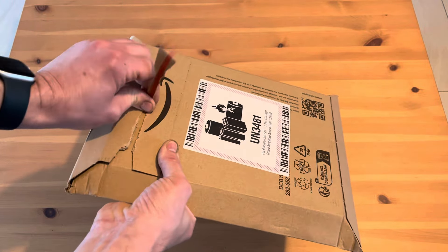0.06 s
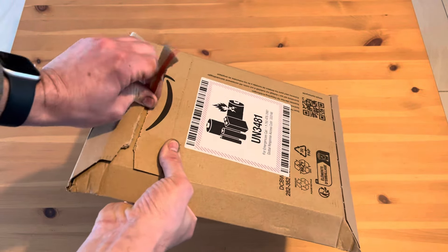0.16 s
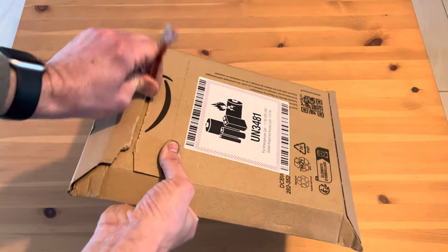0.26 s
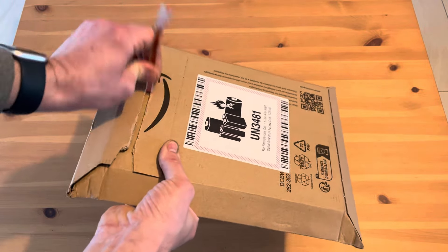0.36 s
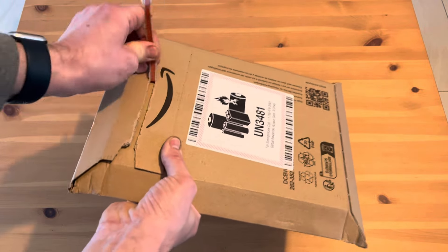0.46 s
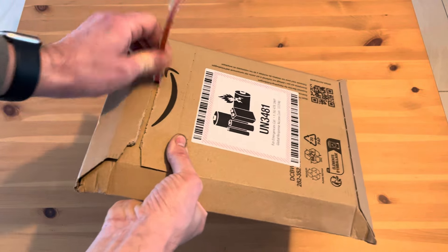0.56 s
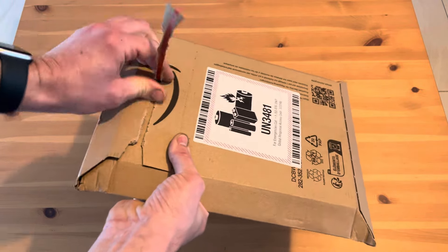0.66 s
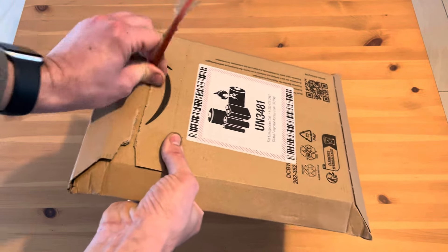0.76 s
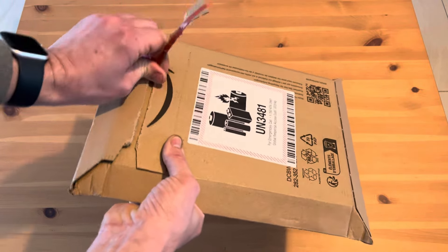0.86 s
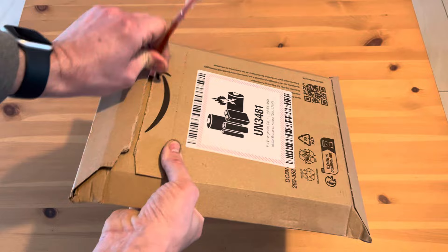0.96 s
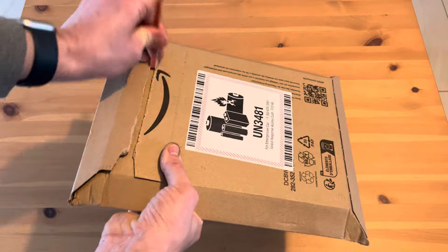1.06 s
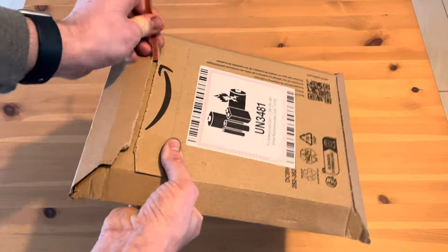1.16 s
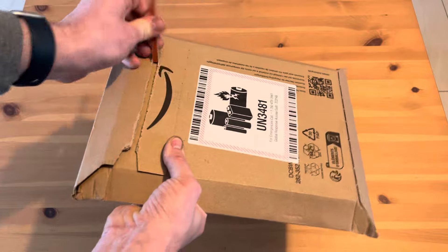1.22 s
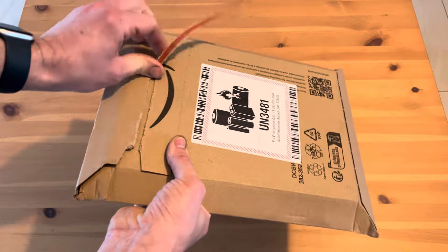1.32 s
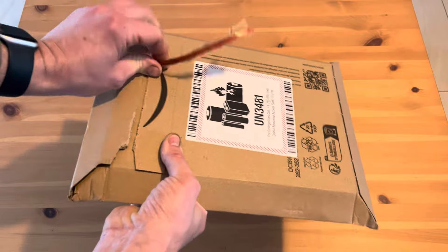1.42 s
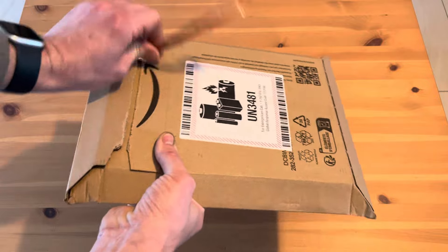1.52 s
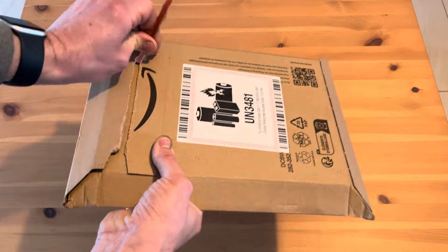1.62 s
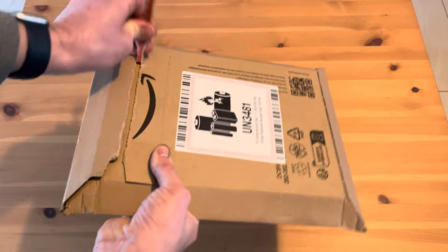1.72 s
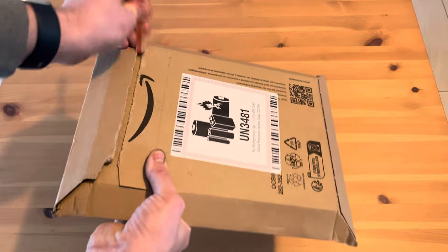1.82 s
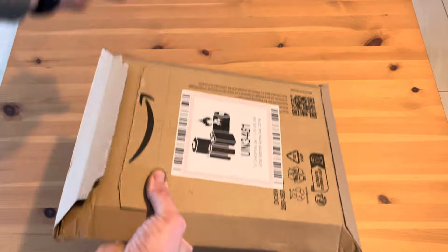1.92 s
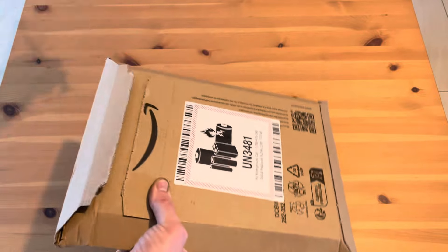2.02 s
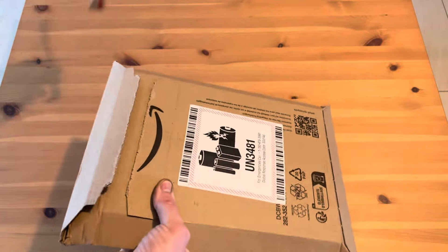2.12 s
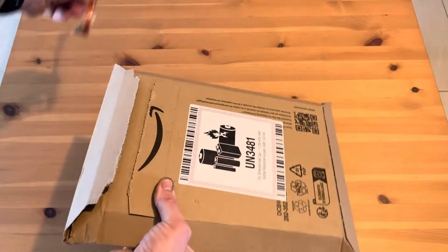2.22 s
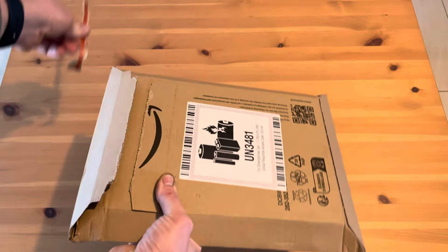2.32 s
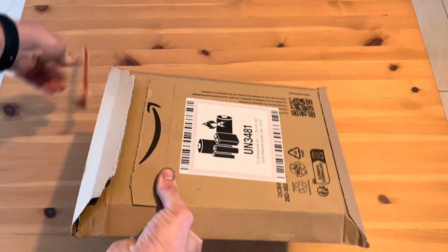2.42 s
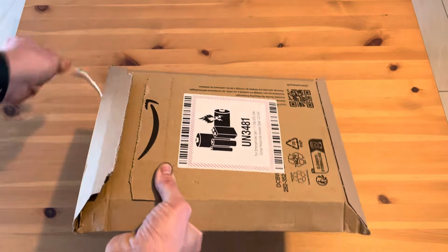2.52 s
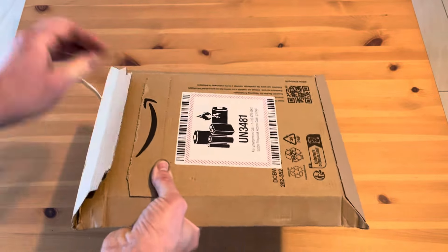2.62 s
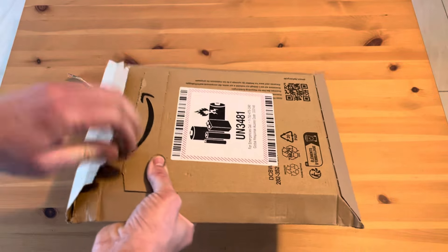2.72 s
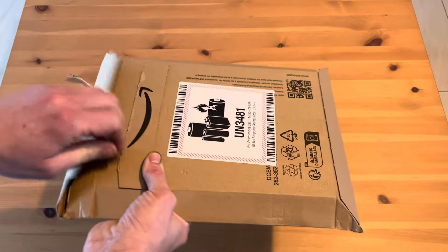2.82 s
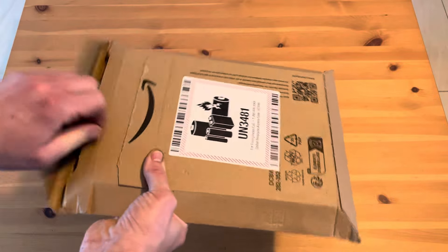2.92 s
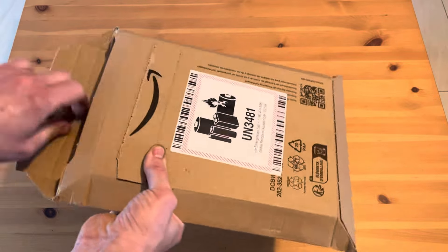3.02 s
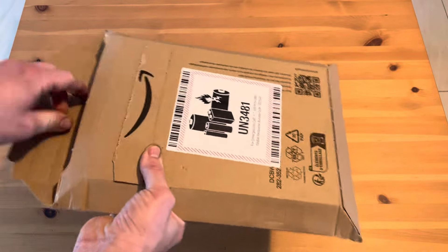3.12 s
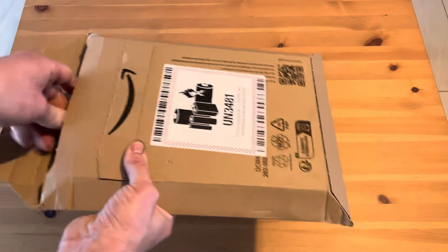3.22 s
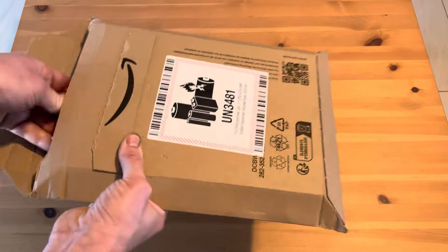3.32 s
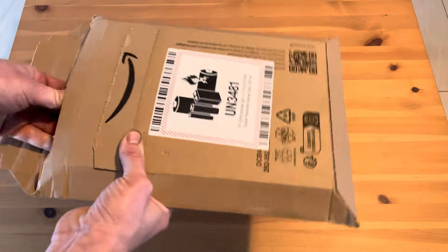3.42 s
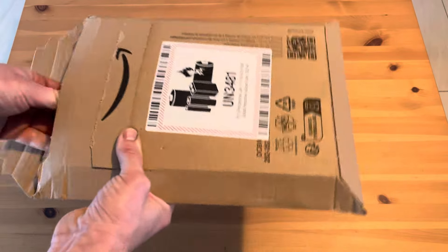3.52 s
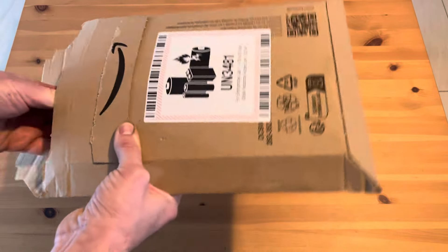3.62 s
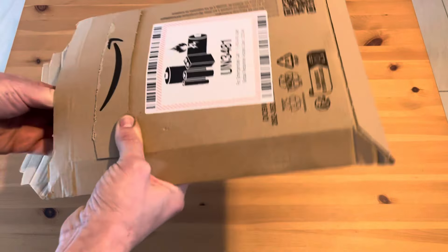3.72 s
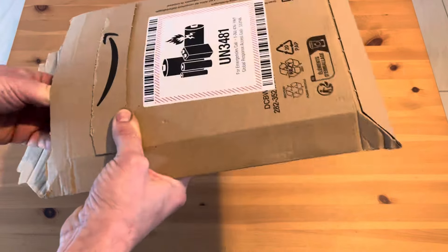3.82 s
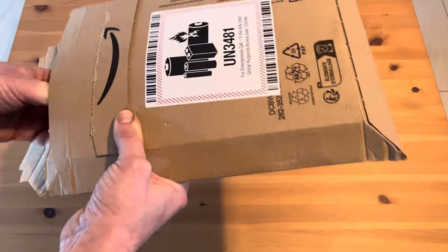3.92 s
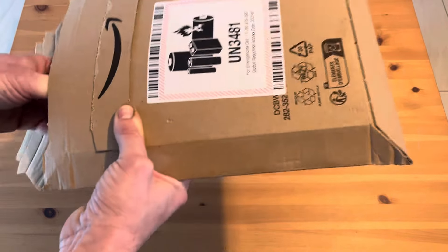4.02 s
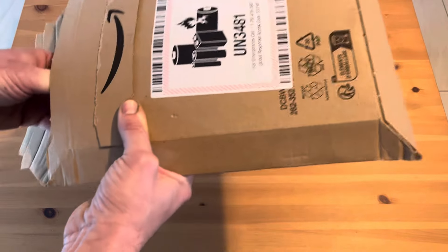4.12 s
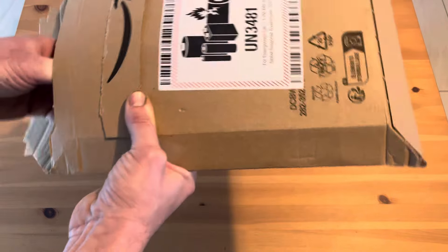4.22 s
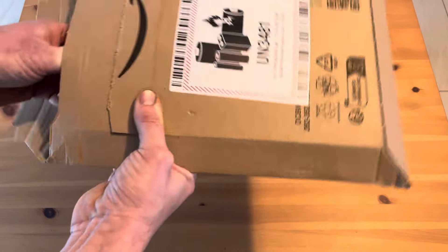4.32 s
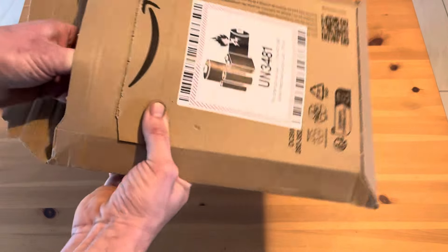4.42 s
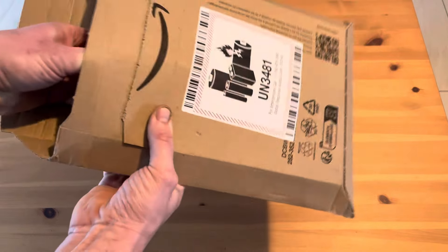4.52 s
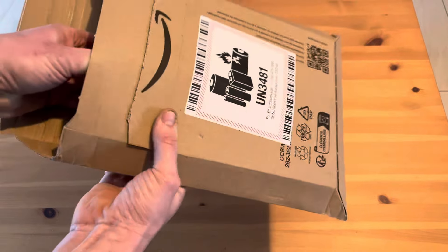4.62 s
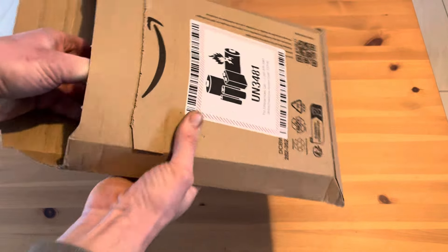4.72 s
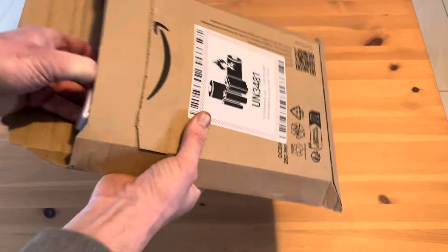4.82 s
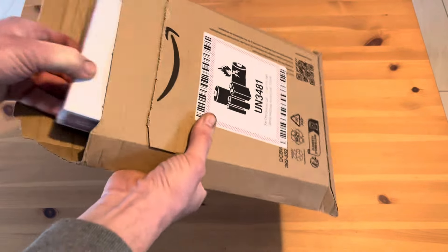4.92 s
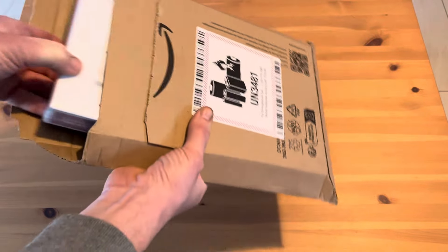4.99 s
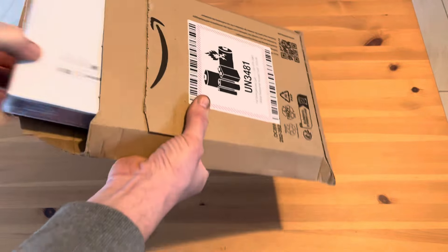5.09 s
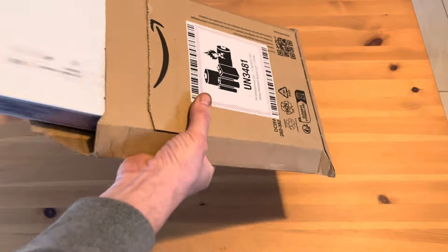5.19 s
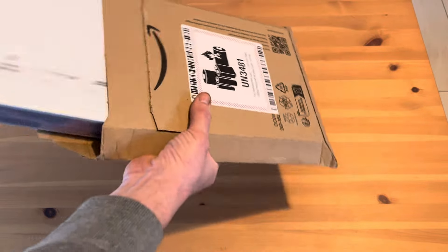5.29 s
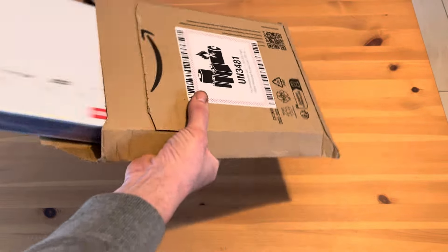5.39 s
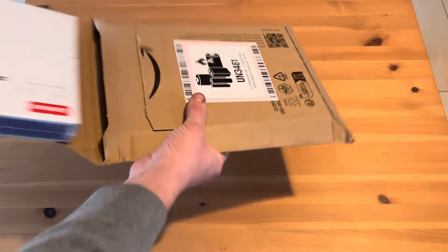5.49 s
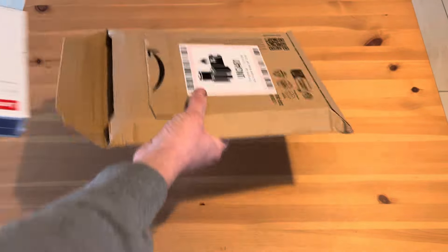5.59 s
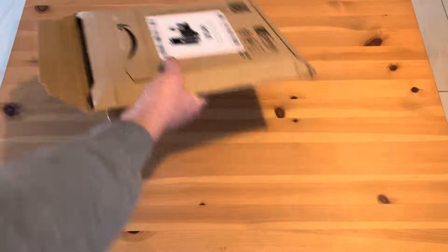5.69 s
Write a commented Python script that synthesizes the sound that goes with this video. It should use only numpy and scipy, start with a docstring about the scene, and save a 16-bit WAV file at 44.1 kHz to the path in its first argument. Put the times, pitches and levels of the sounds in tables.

```python
"""A bare room, over a table top: hands open a cardboard mailer close to a microphone with two ports.
They tear off its strip in three pulls, put the strip aside, fold the flap back and slide a box out.
Streams of random fibre snaps drive panel and board resonances and coloured scratch; creases give as
short bursts of splinters, bent patches pop as fading sines, and the whole parcel heaves as low swings.
Decaying noise makes the room's echo, over quiet air; a faint narrow tone sounds before the first pull."""
import sys
import numpy as np
from scipy import signal
from scipy.fft import rfft, irfft, next_fast_len
from scipy.io import wavfile
from scipy.ndimage import uniform_filter1d

SR = 44100
rng = np.random.default_rng(int(sys.argv[2]) if len(sys.argv) > 2 else 0)


def generate_wav(signal):
    """Clip the signal to [-1, 1] and save it as 16-bit WAV at the path in sys.argv[1]."""
    frames = np.transpose(np.atleast_2d(signal))
    scaled = np.clip(frames, -1, 1) * 32767
    pcm = np.round(scaled).astype(np.int16)
    wavfile.write(sys.argv[1], SR, pcm)


N = 253575  # samples


def undb(db):
    """Amplitude factor for a level in dB."""
    return 10 ** (np.asarray(db) / 20)


def unit(x):
    """Scale to an rms of 1."""
    return x / np.sqrt(np.mean(x ** 2))


def unit_peak(x):
    """Scale to a highest value of 1."""
    return x / x.max()


def on_log(hz, table):
    """Read (f/Hz, value) points on a log-frequency axis."""
    points = np.array(table, float)
    return np.interp(np.log(hz + 1), np.log(points[:, 0] + 1), points[:, 1])


def colour(x, table, size=4096):
    """Causal filter with the given (f/Hz, level/dB) shape, from the folded cepstrum; power gain 1."""
    gain = undb(on_log(np.fft.rfftfreq(size, 1 / SR), table))
    cepstrum = irfft(np.log(gain))
    cepstrum[1:size // 2] *= 2
    cepstrum[size // 2 + 1:] = 0
    impulse = irfft(np.exp(rfft(cepstrum)))
    return signal.fftconvolve(x, impulse / np.sqrt(np.sum(impulse ** 2)))[:len(x)]


def butter(x, order, hz, kind):
    """Butterworth filter of the given kind."""
    return signal.sosfilt(signal.butter(order, hz, kind, fs=SR, output="sos"), x)


def walk(rate):
    """Random values, each held 1 / rate s, then smoothed twice over that time; rms 1."""
    hold = int(SR / rate)
    steps = np.repeat(rng.standard_normal(N // hold + 1), hold)
    return unit(uniform_filter1d(uniform_filter1d(steps, hold), hold)[:N])


def ring(push, modes, spot_db):
    """The push rings each mode; the point of contact wanders, so each mode's share does too."""
    out, power = 0, 0
    for hz, db, t60 in modes:
        radius = np.exp(-np.log(1000) / (t60 * SR))
        poles = [1, -2 * radius * np.cos(2 * np.pi * hz / SR), radius ** 2]
        drifting_push = push * undb(spot_db * walk(30))
        out = out + undb(db) * signal.lfilter([.5, 0, -.5], poles, drifting_push)
        power += undb(2 * db) / (2 * (1 - radius ** 2))
    return out / np.sqrt(power)  # power gain near 1


# Quiet room air: f/Hz, relative density level/dB per Hz
AIR_SHAPE = [(18, -33.5), (45, 16.5), (439, -4.5), (1740, -20.5), (2350, -25), (5250, -34.5), (6410, -50),
             (12000, -19.5), (15600, -61), (22000, -120)]
AIR_DB = -66  # rms of each stream


def quiet_air():
    """Steady coloured noise, the quiet of the room."""
    return undb(AIR_DB) * unit(colour(rng.standard_normal(N), AIR_SHAPE))


WHISTLE_HZ, WHISTLE_WIDTH_HZ, WHISTLE_DB, WHISTLE_ENDS_S = 1760, 155, -63.5, 0.21


def whistle():
    """A faint breathy tone, narrow-band noise, that fades out just before the first pull."""
    b, a = signal.iirpeak(WHISTLE_HZ, WHISTLE_HZ / WHISTLE_WIDTH_HZ, fs=SR)
    fade = np.clip((WHISTLE_ENDS_S - np.arange(N) / SR) / 0.03, 0, 1)
    return undb(WHISTLE_DB) * fade * unit(signal.lfilter(b, a, rng.standard_normal(N)))


# High panel modes of the cardboard: f/Hz, relative level/dB, t60/s
PANEL_MODES = [(750, -3.5, 0.023), (873, 1, 0.03), (1025, 9, 0.012), (1336, 18.5, 0.0072),
               (1695, 12, 0.012), (1840, -5, 0.014)]
# Board and the air inside it: f/Hz, relative level/dB, t60/s
BOARD_MODES = [(87, -12.5, 0.29), (126, -16, 0.042), (163.5, 7.5, 0.065), (196, -3, 0.22),
               (245.7, 5, 0.098), (288, 11, 0.029), (353, 0, 0.06), (410, -4, 0.074), (459, 6, 0.039),
               (525, -18, 0.037)]
# Spectrum of bare scratching: f/Hz, relative level/dB
SCRATCH_SHAPE = [(600, -32), (1800, -3), (2600, 2.5), (4500, 1.5), (7000, -2), (8300, -1), (9500, -30.5)]
# Spectrum of the fizz above it: f/Hz, relative level/dB
FIZZ_SHAPE = [(7500, -45.5), (8600, -2), (10000, 1.5), (12000, 0.5), (13500, -5), (15000, -4),
              (16500, -24.5)]
# the board radiates little below, and is too lossy to ring above
BOARD_LOW_HZ, BOARD_TOP_HZ = 104, 2780


def parcel(rattle, board, scratch, fizz, spot_db):
    """What the cardboard makes of four pushes: panel modes, board modes, bare scratch and fizz."""
    modes = ring(rattle, PANEL_MODES, spot_db) + ring(board, BOARD_MODES, spot_db)
    modes = butter(modes, 2, [BOARD_LOW_HZ, BOARD_TOP_HZ], "band")
    return modes + colour(scratch, SCRATCH_SHAPE) + colour(fizz, FIZZ_SHAPE)


def fibres(rate, spread_db):
    """Fibres snap at random moments, rate per second; most are tiny, a few are large."""
    chance, side, size = rng.random((3, N))
    snaps = (chance < rate / SR) * np.sign(side - .5)
    return unit(snaps * undb(-spread_db * np.log(1 - size)))


def jerks(rate, hold_s):
    """Stick and slip: sudden releases of random size that die away; mean 0, spread 1."""
    chance, size = rng.random((2, N))
    releases = (chance < rate / SR) * -np.log(1 - size)
    slip = signal.lfilter([1], [1, -np.exp(-1 / (hold_s * SR))], releases)
    return (slip - slip.mean()) / slip.std()


HOLD_S = 0.011  # a spell keeps its last level this long


def levels(spells, mix_db):
    """Levels of panel, board, scratch and fizz over time; silence outside the spells."""
    t = np.arange(N) / SR
    db = np.full((4, N), -200.)
    for rows in spells:
        s, *layers = np.transpose(rows)
        on = (t >= s[0]) & (t < s[-1] + HOLD_S)
        db[:, on] = np.array([np.interp(t[on], s, layer) for layer in layers]) + np.c_[list(mix_db)]
    return db


# Hands rub the board: before and between the pulls, on the flap, reaching in, sliding the box out.
# Per spell: t/s, then panel rattle, board ring, scratch and fizz level/dB, before RUB_MIX
RUB_SPELLS = [
    [(0.0, -63, -58, -62, -68), (0.026, -60, -60, -63, -71), (0.04, -60, -71, -63, -69),
     (0.074, -59, -64, -68, -73), (0.086, -69, -52.5, -67, -69), (0.116, -63, -58, -65, -71),
     (0.124, -60, -55, -60, -50), (0.136, -61, -58, -67, -73), (0.172, -63, -54, -58, -51),
     (0.184, -61, -69, -65, -61), (0.2, -52, -64, -55, -52), (0.209, -50, -62, -52, -43)],
    [(0.42, -32, -42, -46, -46), (0.434, -53, -40, -61, -71), (0.482, -57, -50, -58, -68),
     (0.602, -55, -64, -62, -65), (0.612, -41, -55, -52, -55), (0.624, -59, -48, -55.5, -63),
     (0.668, -51, -48, -58, -55.5), (0.776, -51, -63, -55.5, -52.5), (0.808, -44, -56, -49, -39.5),
     (0.846, -55, -56, -59, -66), (0.852, -54, -56, -58, -53)],
    [(1.12, -50, -54, -52, -49), (1.204, -65, -60, -67, -66), (1.228, -50, -47, -56, -52),
     (1.268, -43, -57, -49.5, -54.5), (1.306, -56, -47, -62, -61), (1.338, -61, -58, -65, -67),
     (1.472, -65, -54.5, -60.5, -63.5), (1.56, -55.5, -56, -55, -56), (1.578, -46, -28.5, -40.5, -47),
     (1.588, -45, -39, -57, -57), (1.62, -52, -49, -50, -43)],
    [(2.777, -74, -51.5, -76, -81.5), (2.781, -62, -49.5, -59, -64), (2.787, -55, -47, -48, -61.5),
     (2.799, -52.5, -54, -56, -66), (2.826, -60.5, -55, -58, -62)],
    [(2.836, -44, -55, -44.5, -66), (2.854, -41.5, -32.5, -49, -46.5), (2.892, -38.5, -34.5, -53, -51),
     (2.902, -40, -40, -37.5, -42), (2.912, -46, -38, -51, -53), (2.942, -37, -38, -44, -48),
     (2.958, -38, -25.5, -41, -42.5), (2.976, -34, -22.5, -44.5, -52), (3.052, -53, -62, -63, -69),
     (3.078, -44, -48, -59, -66), (3.083, -56, -55, -60, -67)],
    [(3.093, -48, -46, -50, -62), (3.099, -44, -40, -51, -53), (3.117, -45.5, -35.5, -50.5, -56),
     (3.147, -49, -55, -54, -58), (3.163, -49, -44, -55, -57), (3.193, -48, -41, -56, -56),
     (3.201, -38, -42, -56, -56), (3.233, -55, -44, -60, -62), (3.248, -40, -36, -57, -57)],
    [(3.258, -25, -36, -42, -50), (3.264, -28, -23, -40, -41), (3.276, -35, -27, -47, -51),
     (3.294, -38, -53, -42, -47), (3.304, -20, -23, -41.5, -46), (3.32, -49, -33, -48, -51),
     (3.35, -59, -52, -58.5, -62), (3.432, -71, -48.5, -69, -78), (3.476, -54, -45, -57, -57),
     (3.502, -52, -44, -66, -69)],
    [(3.512, -48, -36, -52, -72), (3.558, -49, -50, -58, -64), (3.612, -53, -49.5, -63.5, -73),
     (3.656, -47, -48.5, -50.5, -58), (3.716, -54, -52, -64, -72), (3.724, -57, -43.5, -51, -59),
     (3.75, -52, -50, -60, -69), (3.79, -47, -45, -56, -65), (3.836, -61, -46, -72, -79),
     (3.868, -54, -49.5, -63, -67), (3.915, -52.5, -61, -66, -69)],
    [(3.925, -33, -49, -43.5, -46), (3.933, -41.5, -44, -53.5, -56), (3.967, -53, -43.5, -63, -69),
     (3.989, -42.5, -45, -47.5, -64), (4.005, -51, -38, -54.5, -58), (4.029, -43, -41, -61, -69),
     (4.059, -61, -66, -62.5, -73), (4.133, -60.5, -58, -61, -69), (4.171, -51.5, -54, -59, -65),
     (4.241, -51.5, -58, -62, -66), (4.245, -52, -61, -58, -61)],
    [(4.255, -42, -35, -50, -58), (4.273, -49, -46, -61, -65), (4.285, -40, -38, -54, -58),
     (4.299, -56, -35.5, -60, -63), (4.323, -56, -57, -56.5, -59), (4.371, -53.5, -59, -55.5, -58),
     (4.399, -52, -54, -53, -58), (4.445, -51.5, -61, -51, -53), (4.457, -54, -45, -51, -56),
     (4.492, -50, -52, -53, -53)],
    [(4.502, -48, -35, -41, -52), (4.504, -31, -35, -44, -49), (4.521, -53, -39, -54, -50)],
    [(4.531, -34, -22, -48, -33), (4.541, -57, -29, -59, -62), (4.561, -60, -61, -61, -64),
     (4.611, -59, -54, -58.5, -63), (4.647, -51.5, -56, -51.5, -54), (4.709, -47, -59, -48, -50),
     (4.737, -48, -51, -48, -50), (4.749, -55, -44, -50, -52), (4.792, -46, -41, -45.5, -47)],
    [(4.802, -34, -18.5, -44, -47), (4.815, -44, -28.5, -46, -45)],
    [(4.825, -26, -42, -38, -46), (4.829, -24.5, -35, -47, -47), (4.837, -45, -33, -45, -48),
     (4.853, -34.5, -34, -46.5, -47), (4.917, -71, -49, -55, -56.5), (5.019, -53, -49, -52.5, -55.5),
     (5.117, -45, -41, -47, -51), (5.173, -55, -41.5, -55, -54), (5.2, -46, -44, -53.5, -55)],
    [(5.21, -47, -40.5, -52, -55), (5.216, -51, -36, -59, -54), (5.234, -57, -44, -61, -54),
     (5.274, -49, -42, -55, -55), (5.288, -56.5, -41.5, -49.5, -56), (5.322, -47, -44.5, -57.5, -57),
     (5.368, -39, -36, -51, -53), (5.376, -34, -45, -43, -55), (5.386, -35, -32.5, -56, -56),
     (5.394, -51, -34.5, -56, -55), (5.421, -37.5, -44, -50, -55)],
    [(5.431, -36, -41, -46, -59), (5.441, -24.5, -25, -50, -59), (5.455, -40.5, -35, -59, -58),
     (5.479, -66, -37.5, -66, -69), (5.527, -61, -45, -70, -80), (5.559, -54, -59, -63, -66),
     (5.631, -60.5, -65, -66, -70), (5.691, -62, -54.5, -62, -67), (5.737, -58, -78, -61, -68),
     (5.75, -57, -63, -60, -66)],
]
# Three pulls on the tear strip, then its end rips free; same columns, before PULL_MIX
PULL_SPELLS = [
    [(0.219, -58, -62, -46, -33), (0.228, -25, -22.5, -40, -28), (0.29, -32, -29, -35.5, -33.5),
     (0.294, -28, -16, -37, -23.5), (0.316, -36, -40, -39, -37), (0.322, -30, -24.5, -38, -34),
     (0.35, -26, -21.5, -35, -32.5), (0.398, -34, -19, -39, -37), (0.42, -53, -40, -62, -49)],
    [(0.86, -50, -47.5, -60, -41), (0.866, -31, -33, -45, -30), (0.886, -38.5, -31.5, -36, -39),
     (0.918, -34.5, -28, -36, -32), (0.948, -48, -23.5, -38, -39), (0.968, -35, -29.5, -41.5, -31),
     (1.02, -38, -21, -40, -36.5), (1.108, -38.5, -45.5, -52.5, -42), (1.12, -54, -43.5, -60, -79)],
    [(1.625, -50.5, -41, -48, -54), (1.637, -37.5, -29, -45, -48), (1.661, -44, -28, -35.5, -37.5),
     (1.693, -36.5, -22.5, -36.5, -34), (1.761, -43.5, -33.5, -41, -42), (1.767, -36.5, -27.5, -39, -37.5),
     (1.793, -32.5, -25, -35, -32), (1.797, -28, -21, -36, -35)],
    [(1.797, -29, -20, -35, -35.5), (1.803, -18, -20, -26.5, -29.5), (1.817, -32, -23, -37.5, -42),
     (1.829, -8.5, -21, -19, -25), (1.837, -24.5, -27.5, -38.5, -41.5), (1.847, -22, -29.5, -19.5, -31),
     (1.865, -31.5, -23.5, -42.5, -49.5)],
]
# Trims for panel, board, scratch, fizz: level/dB
RUB_MIX = (-7, -7, 0, -0.5)
PULL_MIX = (-8.5, -5.5, -0.5, -0.5)
# Corrugations crush: f/Hz, relative level/dB
CRUNCH_SHAPE = [(300, -22), (600, -0.5), (1100, 0), (1700, -5), (2600, -24)]
# Table top under rubbing hands: f/Hz, relative level/dB
RUMBLE_SHAPE = [(20, -17.5), (50, -5.5), (90, 4.5), (160, -25), (400, -60)]
CRUNCH_DB, RUMBLE_DB = -8.5, -6.5  # re panel rattle, re board ring of the rubs
SLIDE_JERK_DB, TEAR_JERK_DB, TEAR_FROM_DB = 1.5, 2, -43.5
WANDER_DB = 1.5  # the rubbed spot moves, so each layer's share drifts
RUB_SOFT_HZ = 1120  # skin and box slide softly and stir the high panel modes less


def handling():
    """Tearing and rubbing: streams of snaps rattle, ring, scratch and fizz; the harder, the jerkier."""
    rub_db = levels(RUB_SPELLS, RUB_MIX)
    pull_db = levels(PULL_SPELLS, PULL_MIX)
    db = np.maximum(pull_db, rub_db)
    jerk_db = np.interp(db[0], [TEAR_FROM_DB, TEAR_FROM_DB + 13.5], [SLIDE_JERK_DB, TEAR_JERK_DB])
    slip = np.clip(jerks(110.0, 0.0062), -2, 2)

    fine = fibres(6000., 1.3)  # drives both scratch and fizz
    hard_rattle = fibres(1500., 1.2)
    soft_rattle = undb(-5.0) * unit(butter(hard_rattle, 1, RUB_SOFT_HZ, "low"))
    rattle = np.where(pull_db[0] > rub_db[0], hard_rattle, soft_rattle)
    snaps = np.array([rattle, fibres(1000., 1.0), fine, fine])
    snaps = snaps * undb(WANDER_DB * np.array([walk(12.) for _ in snaps]))
    # a fixed cut that grows with jerk size offsets the level the jerks add
    jerky_db = db + jerk_db * slip - 0.81 * jerk_db ** 2
    board = parcel(*snaps * undb(jerky_db), spot_db=3.5)

    crunch_db = db[0] + CRUNCH_DB + 2.0 * walk(40.)
    crunch = colour(fibres(700., 2.0) * undb(crunch_db), CRUNCH_SHAPE)
    rumble = colour(rng.standard_normal(N) * undb(rub_db[1] + RUMBLE_DB), RUMBLE_SHAPE)
    return board + crunch + rumble


SPLIT_S, SHAKE_S = 0.00049, 0.0043  # attack of the splinters, decay of the board's shake
DULL_S = 0.00038  # a knock's decay is this much longer for each 10 dB less treble


def splinters(table, mix_db, decay_s, snap):
    """Each crease gives as a few milliseconds of splinters; the board goes on shaking a little longer."""
    push = np.zeros((4, N))
    t = np.arange(1200) / SR
    slow = (1 - np.exp(-t / 0.0019)) * np.exp(-t / SHAKE_S)
    for s, db, board_db, treble_db in table:
        dull_decay_s = decay_s + DULL_S * max(-treble_db / 10, 0)
        sharp = (1 - np.exp(-t / SPLIT_S)) * np.exp(-t / dull_decay_s)
        grit, shake = np.sign(rng.standard_normal((2, len(t)))) * [sharp, slow]
        grit[int(SPLIT_S * SR)] = snap  # the first fibre to go, re the splinters
        layer_db = db + np.array([0, board_db, treble_db, treble_db])
        i = int(s * SR)
        push[:, i:i + len(t)] += undb(layer_db)[:, None] * [grit, shake, grit, grit]
    return parcel(*push * undb(mix_db)[:, None], spot_db=-0.5)


# Creases and snaps: t/s, knock drive level/dB before CRACK_MIX, board ring and treble level/dB re knock
CREASES = [(0.124, -49.5, -3, -1), (0.14, -55, -12, 3), (0.159, -57, -12, -5), (0.173, -59, -10, -1),
           (0.185, -49, -6, 0), (0.206, -36, -10, 1), (0.223, -20, -13.5, -9), (0.235, -32, 0, -8),
           (0.247, -16.5, -25, -7.5), (0.273, -18, -9, -13), (0.294, -18.5, -4.5, -5.5),
           (0.304, -19, -7, -9), (0.321, -19, -6, -4), (0.344, -23.5, 7, -5), (0.354, -21.5, -4, -6),
           (0.401, -25.5, -1.5, -5), (0.613, -35, 4.5, -20), (0.793, -34, -36, -5), (0.81, -33, -9, -9),
           (0.827, -44, -9, 5), (0.863, -34, -2, 3), (0.876, -29, 1, 3.5), (0.886, -16.5, -4.5, -10),
           (0.893, -25.5, 9, -3), (0.936, -21, 0, -8.5), (0.951, -31.5, 7, 4.5), (0.991, -28, 7, 4),
           (1.014, -25, 1, -1), (1.026, -20, 0, -11), (1.063, -28, 3.5, -4), (1.096, -27, -12, -9.5),
           (1.296, -34.5, 4.5, -8), (1.549, -39, -16, 0.5), (1.573, -31.5, -3, -4), (1.634, -23, -1, -7.5),
           (1.715, -22.5, -12, -4.5), (1.738, -22.5, -7, -5), (1.766, -21.5, 1.5, -5), (1.776, -30, 6, -13),
           (1.804, -4.5, -24, -6.5), (1.826, -4.5, -18, -13), (1.845, -17, -3, 3.5),
           (1.85, -12.5, -3, -9.5), (2.783, -51, -0.5, 5), (2.84, -34, -2, -21), (2.851, -35, 2, -15),
           (2.867, -42, -8, 0), (2.901, -23, -5, -8), (2.929, -32, -18, -6), (2.957, -30, 3, -7),
           (2.974, -33, 11, -16), (3.071, -36, -8, -33), (3.093, -31.5, 0, -39), (3.111, -38, 8, -13),
           (3.158, -41, 10, -9), (3.202, -43, 0, -11), (3.258, -24, 5.5, -18), (3.266, -26.5, 0, -19),
           (3.274, -29, 0, -17), (3.301, -19, -5, -31), (3.464, -43, 6, -13), (3.512, -35, -8, -20),
           (3.523, -40, 3, -15), (3.64, -36, -20, -18), (3.722, -35.5, -19, -26), (3.776, -39, -7, -22),
           (3.925, -30, -11, -25), (3.98, -41, -5, -8), (4.256, -38, 3, -15), (4.283, -41, 6, -10),
           (4.502, -39.5, 2.5, 0), (4.531, -24.5, 0.5, -8), (4.748, -41.5, 12.5, -19), (4.769, -40, 11, -5),
           (4.794, -43, -20, -6), (4.802, -23, -13, -19), (4.826, -17.5, -19, -33), (4.854, -30, -3, -21),
           (5.094, -43, 4, -9), (5.212, -36, 7, -21), (5.281, -45, -1, -1), (5.355, -34.5, 3.5, -25),
           (5.374, -36, 2, -18), (5.431, -28, 4, -15.5), (5.439, -31, 7, -16), (5.452, -47, -6, -22)]
# Trims for panel, board, scratch, fizz: level/dB
CRACK_MIX = (-3, 0, 2.5, 1.5)


def cracks():
    """Creases and snaps of the board, each a short burst of splinters."""
    return splinters(CREASES, CRACK_MIX, decay_s=0.002, snap=1.5)


def fading_sines(table):
    """Each is a sine that rises within a cycle and fades in a few."""
    out, t = np.zeros(N), np.arange(4000) / SR
    for s, db, hz, cycles in table:
        i = int(s * SR)
        rise = 1 - np.exp(-t * hz / 0.24)  # 0.24 cycles
        shape = rise * np.exp(-t * hz / max(cycles, .3))
        out[i:i + len(t)] += undb(db) * unit_peak(shape) * np.sin(2 * np.pi * hz * t)
    return out


# Bent patches of board: t/s, peak level/dB, f/Hz, cycles to fade
BENT_PATCHES = [(0.222, -19.5, 935, 3), (0.234, -25.5, 500, 0.89), (0.247, -15, 600, 0.86),
                (0.295, -15, 860, 2.5), (0.306, -21, 423, 1.2), (0.325, -35, 239, 1.2),
                (0.346, -22, 268, 1.1), (0.356, -29, 290, 0.91), (0.362, -21, 246, 1.2),
                (0.401, -24.5, 242, 1.5), (0.876, -19.5, 533, 2.1), (0.939, -29, 280, 2.1),
                (1.015, -14.5, 289, 1.9), (1.026, -21, 289, 4.2), (1.804, -15, 305, 1.5),
                (1.827, -13, 455, 1.4), (1.849, -14, 384, 1.5), (2.851, -34, 800, 2.2),
                (2.868, -30, 970, 4.0), (2.886, -37, 890, 2.7), (2.906, -29, 850, 3.0),
                (2.929, -29, 775, 1.8), (2.976, -23.5, 266, 0.95), (2.985, -24.5, 324, 1.7),
                (3.258, -26, 251, 1.7), (3.259, -21, 1275, 2.4), (3.301, -22.5, 395, 1.2),
                (3.302, -25, 900, 1.9), (3.516, -40, 1300, 3.0), (3.786, -37, 157, 1.6),
                (3.808, -37.5, 143, 1), (3.809, -37.5, 360, 2.3), (3.928, -36.5, 230, 1.4),
                (4.007, -31.5, 178, 1.55), (4.258, -30.5, 188.4, 1.8), (4.283, -42, 870, 3.3),
                (4.529, -25.5, 162, 0.9), (4.53, -23, 766, 2.2), (4.752, -35, 452, 2.0),
                (4.794, -32, 1114, 2.0), (4.804, -20.5, 383, 1.4), (4.826, -15.5, 1500, 2.2),
                (4.829, -22.5, 322, 2.9), (5.355, -39, 400, 1.2), (5.377, -35, 1000, 4.0),
                (5.411, -30, 138, 1.1), (5.431, -26, 1080, 4.1), (5.439, -26, 528, 2.8),
                (5.453, -26, 606, 2.7)]


def pops():
    """A bent patch of board pops in or out and rings at its own pitch."""
    return fading_sines(BENT_PATCHES)


# The whole parcel heaves: t/s, peak level/dB, f/Hz
HEAVES = [(1.852, -32.5, 122), (1.858, -34, 60.7), (2.779, -46.5, 108), (2.863, -40, 127), (2.97, -31, 69),
          (2.99, -43, 62), (3.112, -47, 116), (3.257, -43, 112), (3.302, -40, 124), (3.465, -45.5, 124),
          (3.779, -46, 124), (3.807, -40, 128), (3.928, -48, 61.7), (4.006, -49, 75.5),
          (4.029, -49.5, 83.4), (4.254, -44.5, 114), (4.523, -56, 123), (4.796, -47, 122),
          (4.829, -35, 121), (5.204, -44, 98), (5.372, -43, 113), (5.428, -51, 78), (5.457, -50, 103)]


def thumps():
    """A soft low swing of the whole parcel that swells and dies in a few cycles."""
    out, t = np.zeros(N), np.arange(6000) / SR
    swell = unit_peak((1 - np.exp(-t / 0.013)) * np.exp(-t / 0.017))
    for s, db, hz in HEAVES:
        i = int(s * SR)
        out[i:i + len(t)] += undb(db) * swell * np.sin(2 * np.pi * hz * t)
    return out


# Stiff ends of the torn strip: t/s, peak level/dB, f/Hz, cycles to fade
STRIP_ENDS = [(2.166, -52.5, 4290, 8.5), (2.2497, -67.5, 3530, 8.1), (2.4435, -50, 4050, 7.4),
              (2.4435, -58, 5500, 10), (2.4695, -34, 2910, 4.6), (2.4688, -40.5, 6900, 9.8)]


def strip_pings():
    """The strip's stiff ends ping as high fading sines."""
    return fading_sines(STRIP_ENDS)


# Torn strip put aside: t/s, knock drive level/dB before STRIP_MIX, board ring and treble level/dB re knock
STRIP_KNOCKS = [(2.438, -58.5, -3, 11.7), (2.469, -39, -3.5, 2.2)]
# Trims for panel, board, scratch, fizz: level/dB
STRIP_MIX = (10.5, 2, 3.5, 1)


def strip_ticks():
    """The torn strip ticks as it is put aside: splinters with a very short decay."""
    return splinters(STRIP_KNOCKS, STRIP_MIX, decay_s=0.0003, snap=1.53)


# Echo decay of the bare room: f/Hz, t60/s
ROOM_DECAY = [(60, 0.63), (250, 0.76), (1000, 0.7), (4000, 0.64), (8000, 0.49), (12000, 0.26)]
# What the room is fed: f/Hz, relative echo level/dB
ECHO_SHAPE = [(60, 1), (250, 1), (1000, 0.5), (3000, 3), (8000, -3), (14000, 0)]
ROOM_DB = -16


def room(x):
    """Dense echo of noise that fades at a rate set by frequency; a shared part and an unlike part."""
    f, t, noise = signal.stft(rng.standard_normal((2, SR)), SR, nperseg=512)
    fade = undb(-60 * t / on_log(f, ROOM_DECAY)[:, None])
    tail = signal.istft(noise * fade, SR, nperseg=512)[1]
    # the walls are some metres off, so the echo builds over 11 ms
    tail = tail * np.clip(np.arange(tail.shape[1]) / SR / 0.011, 0, 1) ** 2
    tail = tail / np.sqrt(np.sum(tail[0] ** 2))
    return undb(ROOM_DB) * signal.fftconvolve(colour(x, ECHO_SHAPE)[None], tail, axes=1)[:, :N]


SCATTER_LOW_HZ = 420  # longer waves pass round the hands


def scatter(x, count=4):
    """Hands and table top scatter the sound for some milliseconds; the paths change as the hands move."""
    t = np.arange(1500) / SR
    x = butter(x, 2, SCATTER_LOW_HZ, "high")
    paths = rng.standard_normal((count, len(t))) * np.exp(-t / 0.0026)
    paths = paths / np.sqrt(count * np.sum(paths ** 2, axis=1, keepdims=True))
    return sum(signal.fftconvolve(x * walk(16.0), path)[:N] for path in paths)


# Weight of the part unlike at the two ports: f/Hz, level/dB
APART_SHAPE = [(60, -12), (250, -3), (600, 3.5), (1400, 3.5), (3000, -1), (7000, 8.5), (8400, -33),
               (12000, -9), (15000, -18)]


def widen(shared, apart):
    """Left and right from a shared and an unlike part, the latter weighted by frequency."""
    weight = undb(on_log(np.fft.rfftfreq(N, 1 / SR), APART_SHAPE))
    apart = irfft(rfft(apart) * weight, N)
    return np.array([shared + apart, shared - apart])


def scene():
    """The close parcel in its room; the strip, further off, sends more of its ticks into the echo."""
    strip = strip_ticks()
    near = handling() + cracks() + pops() + strip_pings() + thumps() + whistle() + strip
    shared_echo, apart_echo = room(near + undb(13) * strip)
    apart = undb(-4.5) * apart_echo + undb(-9.0) * scatter(near) + quiet_air()
    return near + widen(shared_echo + quiet_air(), apart)


# Phase between the microphone ports: f/Hz, radians by which left leads
PORT_LEAD = [(0, 0), (600, 0), (1550, 1.3), (1810, .3), (2840, 1.1), (4740, .1), (6550, -1.1), (7670, -2.4),
             (8300, -3.1), (9000, -3.8), (11100, -6), (13000, -6.5), (14600, -9.2), (16000, -9.4)]
# Level between the ports: f/Hz, left minus right level/dB
PORT_BALANCE = [(60, 1.0), (110, 1.5), (200, 1.5), (380, 3.0), (700, 1.0), (1290, 2.0), (2380, 2.5),
                (4400, 5.5), (8120, 0.5), (15000, 0.0)]
LOW_HZ, TOP_HZ = 36.8, 16300


def record(dry):
    """The two ports differ in lag and level by frequency; the deep bass falls away and the top is cut."""
    size = next_fast_len(N + 4096)
    hz = np.fft.rfftfreq(size, 1 / SR)
    # each port takes half of the difference
    half_lead = np.exp(.5j * np.interp(hz, *np.transpose(PORT_LEAD)))
    half = undb(on_log(hz, PORT_BALANCE) / 2) * half_lead
    ports = irfft(rfft(dry, size) * np.array([half, 1 / half]), size)[:, :N]
    ports = butter(ports, 2, LOW_HZ, "high")
    return signal.sosfilt(signal.ellip(10, .2, 90, TOP_HZ, fs=SR, output="sos"), ports)


dry = scene()
out = record(dry)
generate_wav(out)
```